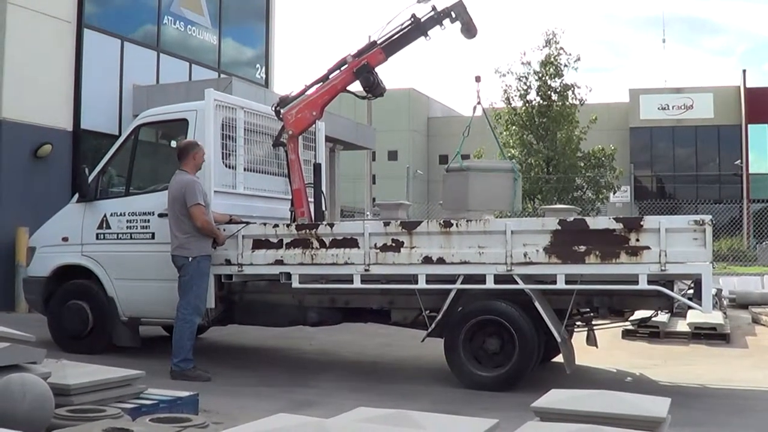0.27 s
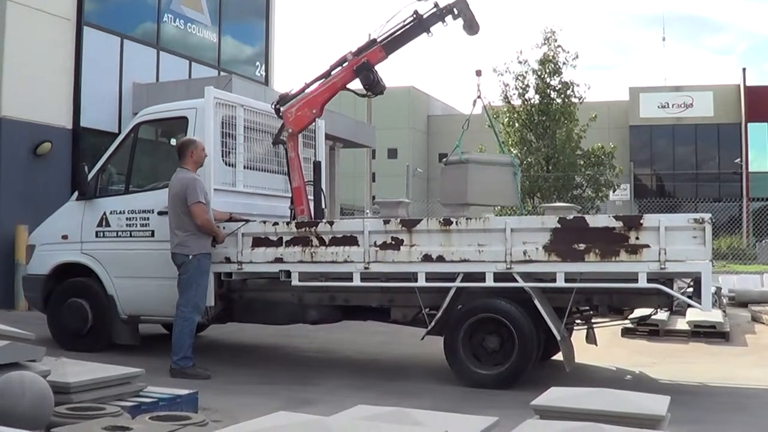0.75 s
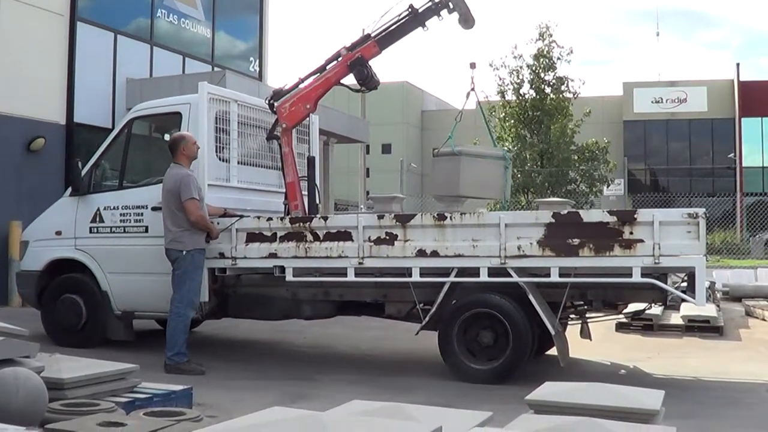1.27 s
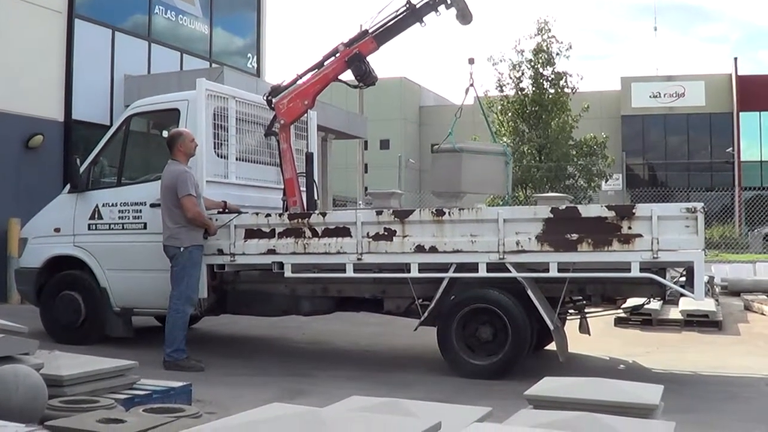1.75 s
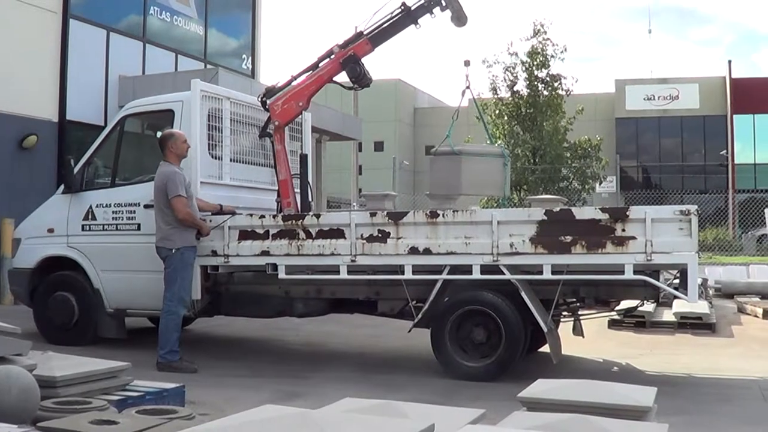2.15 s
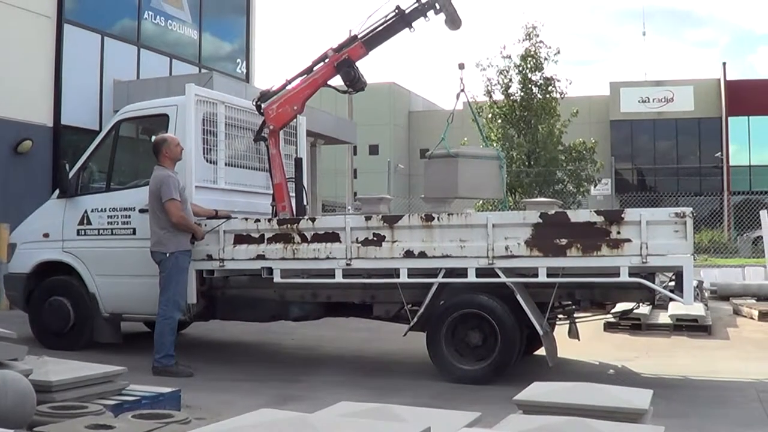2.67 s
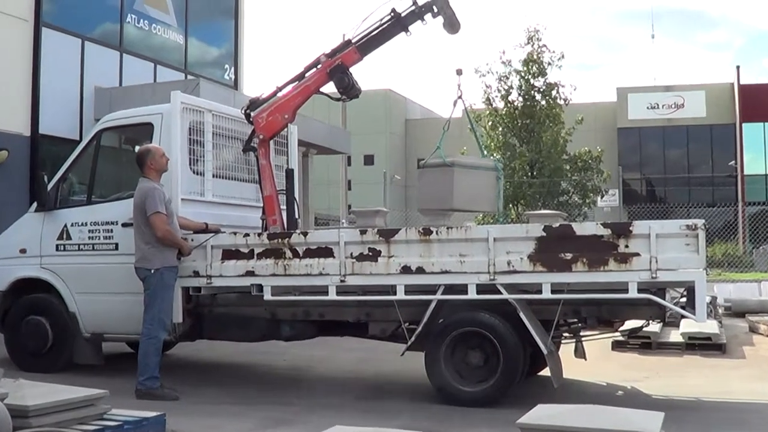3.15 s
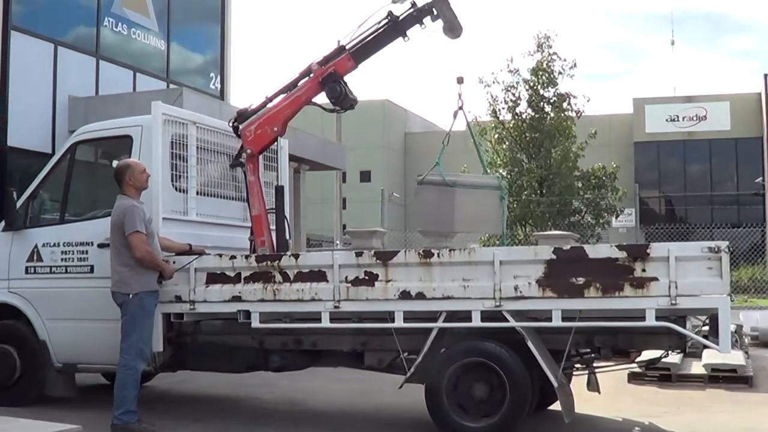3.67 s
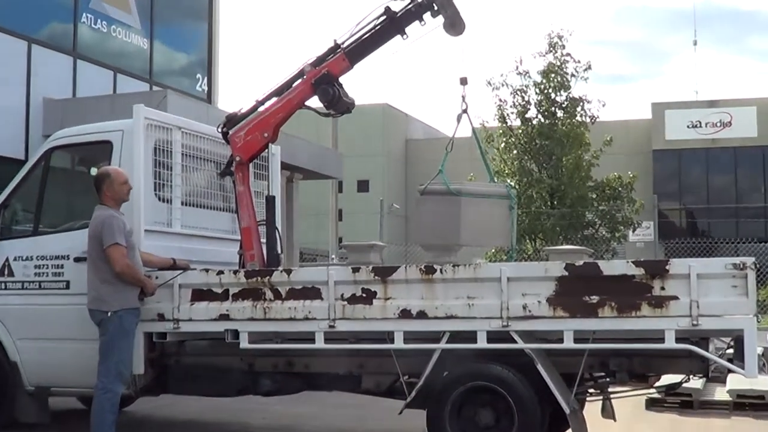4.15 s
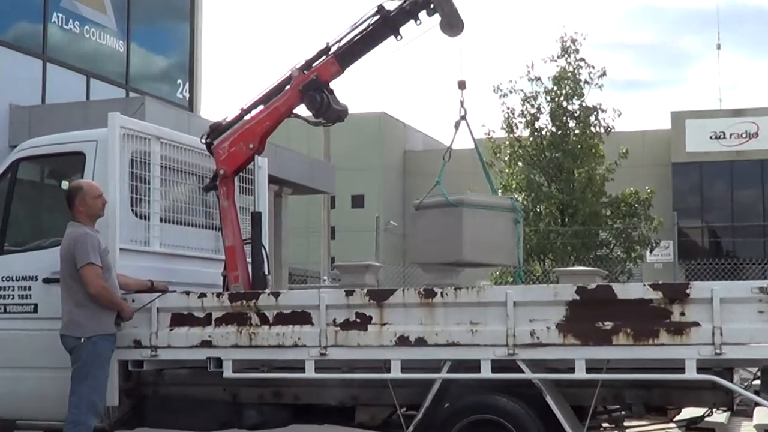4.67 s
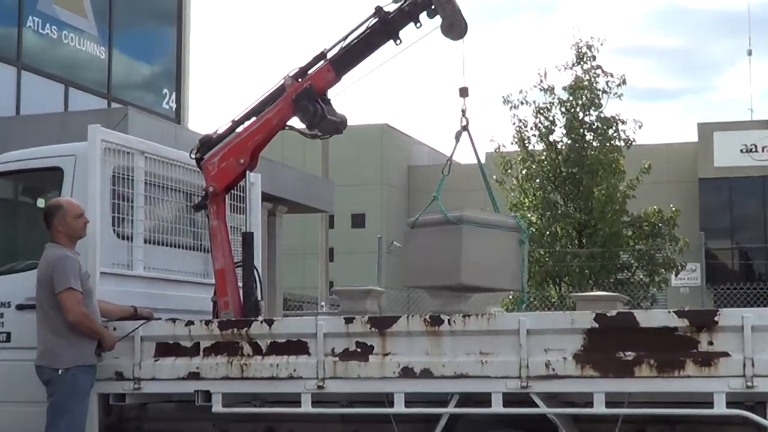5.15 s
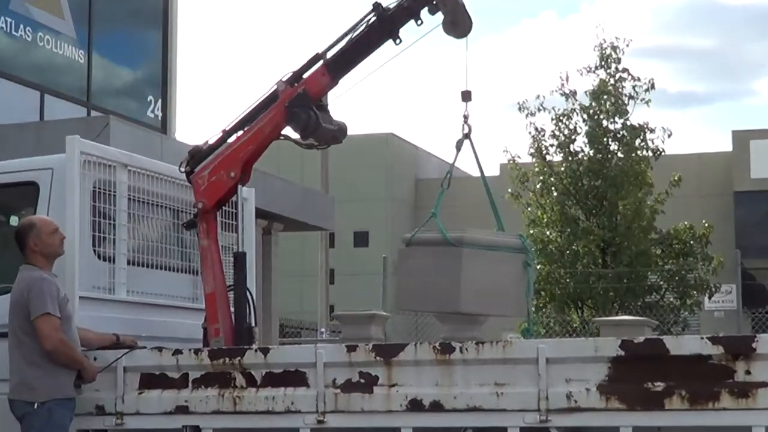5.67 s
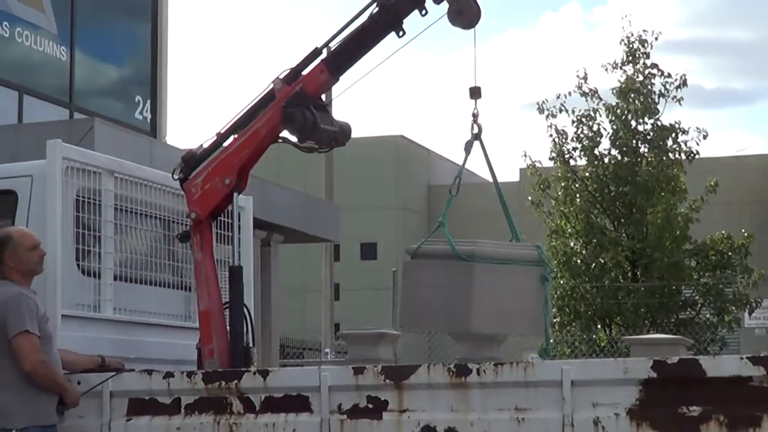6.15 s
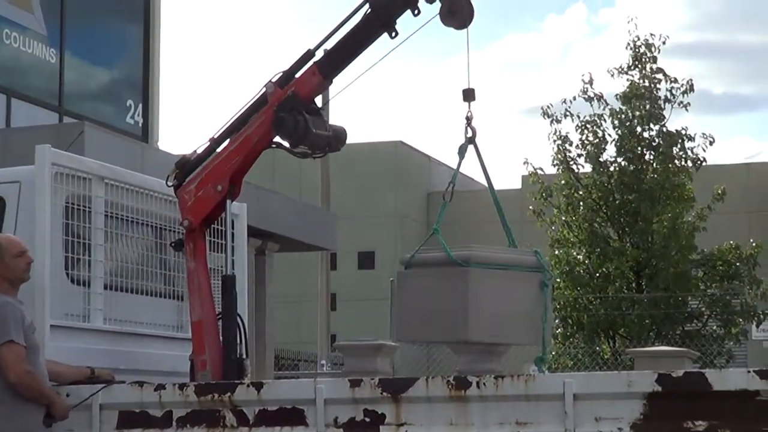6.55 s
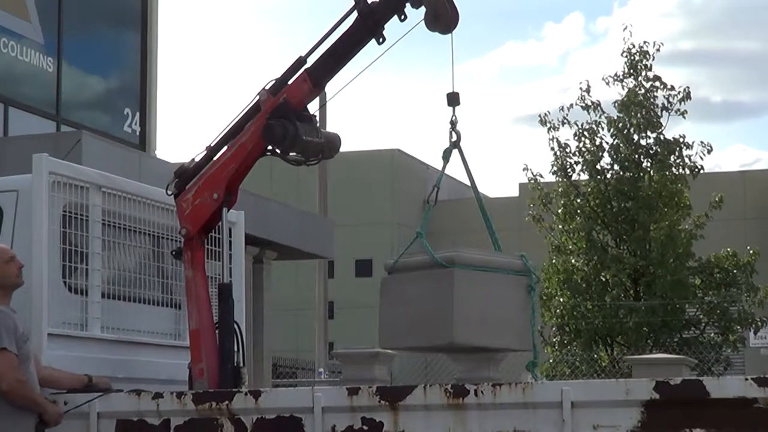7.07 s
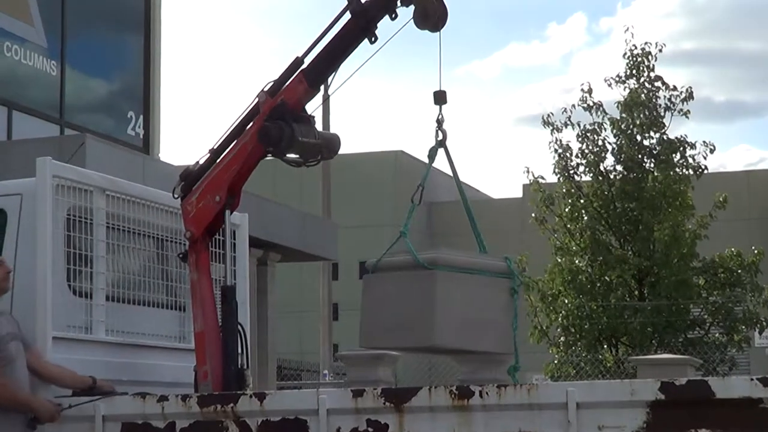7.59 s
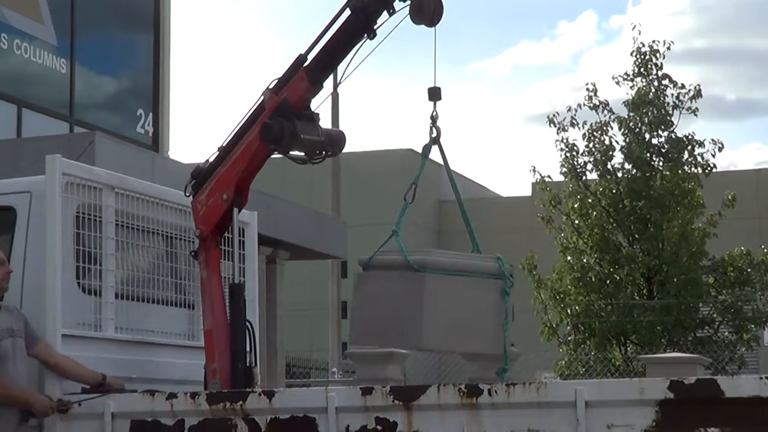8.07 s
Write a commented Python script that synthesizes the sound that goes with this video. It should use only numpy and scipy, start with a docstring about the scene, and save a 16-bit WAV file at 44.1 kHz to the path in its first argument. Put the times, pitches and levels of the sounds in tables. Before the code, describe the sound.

A truck crane's hydraulic pump whines steadily, briefly racing higher, while wind buffets the microphone over a low rumble.

```python
"""A truck crane swings a hanging load in a yard; gusts buffet the microphone over a low, steady rumble.
At first the gear pump whines evenly. A valve shuts, its lever clicks twice amid the hardest gusts,
and the pump races while the oil runs free. Near 3 s a valve takes up the load: oil rushes in the
lines and the pump labours again. From 3.7 s the crane grows louder and seems closer."""
import sys
import numpy as np
from scipy import signal
from scipy.fft import rfft, irfft, next_fast_len
from scipy.io import wavfile
from scipy.ndimage import uniform_filter1d, map_coordinates

SR = 44100
rng = np.random.default_rng(int(sys.argv[2]) if len(sys.argv) > 2 else 0)


def master(y):
    """Save y as 16-bit WAV."""
    cut = np.clip(np.atleast_2d(y).T, -1, 1)
    pcm = np.round(cut * 32767)  # scale
    wavfile.write(sys.argv[1], SR, pcm.astype(np.int16))


N = 366912

# background rumble of the yard: (frequency [Hz], relative level [dB])
RUMBLE_SPECTRUM = [(20, 7), (50, 24), (130, 0), (250, -16), (500, -25), (1200, -31), (4000, -92)]
# likeness of left and right at the microphone: (frequency [Hz], correlation [0-1])
YARD_COHERENCE = [(100, 0.86), (1000, 1), (8000, 0.72), (12000, 1)]
WIND_COHERENCE = [(30, 0.56), (120, 0.89), (260, 0.1), (1000, 0.033)]
# wind thumping, tearing and flapping at the microphone's rim: (frequency [Hz], relative level [dB])
BUFFET_SPECTRUM = [(15, -9.5), (30, -12.5), (60, -3), (130, 1), (200, -5.5), (300, -12.5), (500, -24.5),
                   (1000, -33.5), (3000, -86)]
TEAR_SPECTRUM = [(40, -29), (90, -13.5), (150, 0), (250, 0.5), (340, -4.5), (450, -10), (700, -19.5),
                 (1300, -44), (4000, -89)]
FLAP_SPECTRUM = [(300, -31), (650, 5), (1300, -2), (2200, -15), (4000, -48)]
# gusts on the microphone: (time [s], rise [s], fall [s], peak strength [dB])
WIND_GUSTS = [(.25, 0.12, 0.25, -46), (.71, 0.15, 0.12, -30.5), (1.6, 0.18, 0.16, -32),
              (1.754, 0.063, 0.12, -19.5), (2.1, 0.039, 0.091, -22.5), (2.372, 0.15, 0.15, -22.5),
              (2.92, .12, 0.19, -37.5), (4.2, 0.23, .14, -43), (5.45, 0.17, 0.14, -33.5),
              (5.93, 0.082, 0.19, -38.5), (6.74, 0.068, .15, -26.5), (8.32, .15, 0.23, -30.5)]
# the stronger single puffs: (time [s], relative peak [dB])
WIND_PUFFS = [(.186, -22.5), (0.322, -30.5), (.45, -30), (0.558, -31.5), (.642, -26.5), (0.749, -20.5),
              (.778, -22), (.939, -31.5), (1.068, -33.5), (1.139, -28), (1.356, -25.5), (1.445, -24),
              (1.522, -19), (1.579, -24.5), (1.622, -23.5), (1.931, -18), (1.982, -18), (2.066, -23.5),
              (2.232, -23.5), (2.331, -23.5), (2.605, -30), (2.772, -33), (3.03, -29.5), (3.433, -36.5),
              (3.605, -34), (3.85, -36), (4.045, -32), (4.172, -31.5), (4.311, -30.5), (4.453, -34.5),
              (4.863, -32.5), (5.027, -30), (5.225, -30.5), (5.424, -27), (5.504, -26.5), (5.884, -32),
              (5.97, -23.5), (6.054, -32), (6.253, -30.5), (6.433, -29.5), (6.531, -30.5), (6.675, -26),
              (6.777, -24.5), (6.861, -27.5), (6.969, -26), (7.038, -27.5), (7.136, -30), (7.348, -32.5),
              (7.45, -28), (7.847, -33), (7.971, -33.5), (8.2, -29), (8.289, -31)]
# the crane grows louder at the microphone, as if closer: (time [s], gain [dB])
CLOSENESS = [(3.7, 0), (4.6, 1.5), (5.45, 4), (6.2, 4.5), (8.32, 6)]
# oil runs through a valve while it stands open: (opens [s], shuts [s], level before CLOSENESS [dB])
VALVE_OPENINGS = [(-.5, 1.32, -62.5), (2.94, 8.6, -47)]
# oil rushing and hissing in the lines: (frequency [Hz], relative level [dB])
RUSH_SPECTRUM = [(200, -7), (370, 4), (500, -2.5), (620, -5), (700, 0.5), (850, -7), (1000, -14), (1300, 2),
                 (1500, -6), (1780, 4.5), (2050, -3), (2600, -16), (5000, -21), (15000, -21.5)]
HISS_SPECTRUM = [(300, 1), (1000, 6), (2000, 1.5), (2800, 4), (3800, 6), (5300, 3), (6700, 4), (7150, 10),
                 (7600, 3.5), (9000, 0.5), (11500, -6), (13200, -3), (15800, -4.5)]
# short bands of oil hiss, and a brief ring near 700 Hz as the pump slows:
# (time [s], half length [s], centre [Hz], width [Hz], level [dB])
HISS_AND_RING_BANDS = [(.33, 0.21, 3230, 389, -57.5), (1.184, 0.17, 9100, 1370, -54.5),
                       (3.046, 0.043, 8970, 6000, -50), (3.135, 0.036, 11500, 3487, -50),
                       (3.249, 0.036, 6940, 5990, -52.5), (3.277, 0.032, 711, 109.8, -39.5),
                       (3.358, 0.17, 712, 70, -49.5), (3.357, 0.092, 2260, 119.9, -50.5),
                       (5.73, .06, 1800, 300, -45), (6.93, .05, 1780, 300, -41.5),
                       (8.047, 0.054, 1780, 299.5, -49), (8.13, 0.024, 8000, 6000, -48),
                       (8.185, 0.0084, 8480, 5004, -41.5), (8.203, 0.01, 7800, 5013, -41.5)]
# the lever hitting its stop: (time [s], gain [dB], low cut [Hz])
LEVER_CLICKS = [(1.563, -30, 5400), (2.03, -29, 2480)]
# ring of the lever's steel: (frequency [Hz], relative level [dB], t60 [s])
LEVER_MODES = [(2494, -8, 0.047), (4165, -1, 0.026), (4600, -8, 0.044), (7270, -4, 0.035),
               (8270, -2, 0.083), (11000, -25, .05)]
# the pump's speed: (time [s], tooth rate [Hz])
PUMP_SPEED = [(0, 596), (.6, 598.2), (.97, 604.7), (1.14, 614.8), (1.41, 638.7), (1.5, 726), (1.56, 763),
              (1.68, 737.5), (1.81, 676), (1.9, 584), (2.09, 591), (2.2, 713), (2.27, 762), (2.41, 817),
              (2.53, 849), (2.8, 859.4), (2.97, 845.5), (3.08, 738.4), (3.2, 688.4), (3.31, 546.6),
              (3.42, 544), (3.49, 553.8), (4.1, 566), (4.24, 575.5), (4.36, 574.6), (4.54, 585.3),
              (4.72, 580.8), (5.15, 592.8), (5.42, 595.8), (6.02, 578), (6.24, 582.5), (6.36, 579.8),
              (6.49, 584.4), (6.61, 583.5), (7.2, 589.3), (7.58, 597.7), (7.76, 597.6), (8.2, 586.5),
              (8.32, 582)]
# resonances of the pump housing and crane column: (centre [Hz], width [Hz], relative level [dB])
HOUSING_MODES = [(3220, 990, -5), (3500, 750, 1.5), (4200, 440, -1.5), (4750, 490, -3), (5910, 240, -5),
                 (6486, 150, 0), (6980, 650, 2.5), (8293, 230, 1.5), (9700, 1100, -7.5), (10650, 280, -4),
                 (11700, 588, -7), (12950, 810, 0), (14180, 440, 0.5), (15400, 400, -12)]
# standing waves that the low harmonics slide through: (centre [Hz], width [Hz], gain [dB])
STANDING_WAVES = [(556.4, 30, -38), (586.5, 20.4, -39.5), (630, 22.4, -38), (711, 67, -35.5),
                  (809, 130, -41), (1152, 124, -52.5), (1186, 16, -47.5), (1234, 114, -54.5),
                  (1724, 210, -60), (1814, 16, -54), (1922, 38, -53), (2309.6, 38, -49.5),
                  (2377, 44, -56.5)]
# strong tones beside the low harmonics: (harmonic [number], offset [shaft orders], relative level [dB])
SHAFT_SIDEBANDS = [(1, -5, -16), (1, -4, -27.5), (1, -1, -17.5), (2, -1, -12.5), (2, 1, -0.5), (3, 1, -14),
                   (4, 2, -10.5)]

TEETH, TOP_HZ = 13, 15830  # teeth on the pump's gear; the microphone's band limit
FADE_DB = 0.68  # slow random swelling and fading of the whine, deeper for higher harmonics


def amp(db):
    return 10 ** (np.asarray(db) / 20)


def unit_rms(x):
    return x / np.sqrt(np.mean(x ** 2) + 1e-20)


def over_frequency(points, hz):
    """Join (frequency, value) points on a log axis."""
    knots_hz, values = np.transpose(points)
    return np.interp(np.log(hz + 1), np.log(knots_hz + 1), values)


def over_time(points):
    """Join (time, value) points, one value a sample."""
    return np.interp(np.arange(N) / SR, *np.transpose(points))


def wobble(rate):
    """A smooth random curve, rate knots a second."""
    steps = np.arange(0, N + 32, 32)
    knots = rng.standard_normal(int(N * rate / SR) + 4)
    return np.interp(np.arange(N), steps, map_coordinates(knots, [steps * rate / SR]))


def held(on_s, off_s, attack_s, release_s):
    """Rises from 0 to 1 after on_s, holds, and falls after off_s."""
    t = np.arange(N) / SR
    return np.clip((t - on_s) / attack_s, 0, 1) * np.clip(1 - (t - off_s) / release_s, 0, 1)


def swell(peak_s, rise_s, fall_s):
    """A bell curve that reaches 1 at peak_s."""
    t = np.arange(N) / SR - peak_s
    near, out = (t > -4 * rise_s) & (t < 4 * fall_s), np.zeros(N)
    out[near] = np.exp(-(t[near] / np.where(t[near] < 0, rise_s, fall_s)) ** 2)
    return out


def filtered(x, response):
    """Shape x by a gain that depends on frequency."""
    size = next_fast_len(N + SR // 4)
    return irfft(rfft(x, size) * response(np.fft.rfftfreq(size, 1 / SR)), size)[..., :N]


def resonances(modes, floor_db, hz):
    """Gain of a set of resonances over a flat floor."""
    power = sum(amp(db) ** 2 / (1 + (2 * (hz - centre) / width) ** 2) ** 2
                for centre, width, db in modes)
    return np.sqrt(amp(floor_db) ** 2 + power)


def stereo_noise(spectrum, coherence):
    """Coloured noise of rms 1, built as a mid-side pair."""
    def mid_side_gains(hz):
        spread = np.arccos(np.clip(over_frequency(coherence, hz), -1, 1)) / 2
        return amp(over_frequency(spectrum, hz)) * [np.cos(spread), np.sin(spread)]
    mid, side = filtered(rng.standard_normal((2, N)), mid_side_gains)
    return unit_rms(np.array([mid + side, mid - side]))


def yard_rumble(level_db):
    """The low, steady bed behind everything else."""
    return amp(level_db) * stereo_noise(RUMBLE_SPECTRUM, YARD_COHERENCE)


def eddies(spectrum, steady_s):
    """Turbulence whose strength holds over spans longer than steady_s."""
    air = stereo_noise(spectrum, WIND_COHERENCE)
    power = uniform_filter1d(np.mean(air ** 2, 0), int(steady_s * SR) + 1)
    return air / np.sqrt(np.abs(power) + 1e-6)


def torn_share(strength, half_db=-25, span_db=5.5):
    """The share of the wind that tears: half of it at a strength of half_db."""
    return 1 / (1 + np.exp((half_db - 20 * np.log10(strength)) / span_db))


def wind(breeze_db=-44.5, puff_db=2.5, lumpy_db=3, tear_db=1, flap_db=-14, rip_db=5):
    """Right on the microphone: eddies thump, fast gusts tear into a brighter roar, hard puffs flap."""
    gusts = amp(breeze_db) + sum(amp(db) * swell(s, rise, fall) for s, rise, fall, db in WIND_GUSTS)
    puffs = sum(amp(db + puff_db) * swell(s, rise_s=0.014, fall_s=0.019) for s, db in WIND_PUFFS)
    torn = torn_share(gusts + 0.08 * puffs)
    force = np.maximum(gusts * amp(lumpy_db * (1.5 - torn) * wobble(40)), puffs)
    thump = (1 - torn) * eddies(BUFFET_SPECTRUM, steady_s=0.0238)
    roar = np.sqrt(torn) * amp(tear_db) * eddies(TEAR_SPECTRUM, steady_s=0.0205)
    flap_gain = torn_share(gusts + 0.18 * puffs) * amp(flap_db + rip_db * wobble(140))
    flap = flap_gain * stereo_noise(FLAP_SPECTRUM, WIND_COHERENCE)
    return force * (thump + roar + flap)


def yard_reverb(direct, t60_s=0.33, gap_s=0.004, dull_hz=9000):
    """Walls and the truck's flank answer briefly, differently left and right."""
    t = np.arange(SR // 3) / SR
    tail = rng.standard_normal((2, len(t))) * amp(-60 * t / t60_s) * (t > gap_s)
    wet = signal.fftconvolve(direct[None], tail / np.linalg.norm(tail[0]), axes=1)[:, :N]
    return filtered(wet, lambda hz: 1 / (1 + (hz / dull_hz) ** 2))


def wall_whine(shaft, delay_s=0.035):
    """Off the walls the whine comes late and blurred, in opposite phase at the two microphone ports."""
    late = shaft - np.gradient(shaft) * SR * delay_s
    echo = gear_whine(late, blur_hz=49, waver_db=-0.2, shudder_db=7, racing_db=6, floor_db=-58)
    return echo * np.array([[1], [-1]])


def oil_flow(shaft, throb=0.13, grain=0.35, sputter_db=1.7, surge_db=1.47, hiss_db=-55, jet_db=-10):
    """Oil surges through the open valve, pulsing each turn; its hiss follows pump speed and effort."""
    flow = sum(amp(db) * held(opens, shuts, attack_s=0.13, release_s=0.18)
               for opens, shuts, db in VALVE_OPENINGS)
    flow = flow * amp(over_time(CLOSENESS))
    rush = stereo_noise(RUSH_SPECTRUM, YARD_COHERENCE) * (1 + throb * np.sin(shaft))
    rush = unit_rms(rush * amp(sputter_db * wobble(110) + surge_db * wobble(9)))
    hiss = unit_rms(stereo_noise(HISS_SPECTRUM, YARD_COHERENCE) * (1 + grain * np.sin(TEETH * shaft)))
    octaves = np.log2(over_time(PUMP_SPEED) / PUMP_SPEED[0][1])
    pump_hiss = amp(hiss_db + 0.18 * effort_db() + 5 * octaves)
    return flow * rush + np.hypot(pump_hiss, amp(jet_db) * flow) * hiss


def hisses_and_ring():
    """Short bands of oil hiss, and a brief ring near 700 Hz as the pump slows."""
    t, out = np.arange(N) / SR, np.zeros(N)
    for s, half_s, centre_hz, width_hz, db in HISS_AND_RING_BANDS:
        white = rng.standard_normal(N)
        band = filtered(white, lambda hz: 1 / (1 + ((hz - centre_hz) / width_hz * 2) ** 2))
        out += amp(db) * np.exp(-((t - s) / half_s) ** 2) * unit_rms(band)
    return out


def valve_lever(scrape_t60_s=0.047, rise_s=0.0014, bounce_s=0.007, bounce_gain=0.39):
    """The lever hits its stop and bounces: a scrape and a short steel ring."""
    t, out = np.arange(SR // 4) / SR, np.zeros(N)
    for s, db, low_cut_hz in LEVER_CLICKS:
        low_cut = signal.butter(2, low_cut_hz, 'high', fs=SR, output='sos')
        for delay, gain in ((0, 1), (bounce_s, bounce_gain)):
            ring = sum(amp(level - 60 * t / t60) * np.sin(2 * np.pi * (hz * t + rng.random()))
                       for hz, level, t60 in LEVER_MODES)
            scrape = amp(-60 * t / scrape_t60_s) * rng.standard_normal(len(t))
            contact = (ring + scrape) * (1 - np.exp(-t / rise_s))
            out[round((s + delay) * SR):][:len(t)] += amp(db) * gain * signal.sosfilt(low_cut, contact)
    return out


def effort_db(slack_db=-14):
    """The pump loses pressure when the first valve shuts and recovers after the second lever click."""
    return slack_db * held(VALVE_OPENINGS[0][1], LEVER_CLICKS[1][0], attack_s=0.57, release_s=0.39)


def shudder(steady=0.12, per_octave_s=0.381, inertia_s=0.15):
    """The pump runs rougher the faster its speed changes."""
    octaves_per_s = np.abs(np.gradient(np.log2(over_time(PUMP_SPEED)))) * SR
    return steady + per_octave_s * uniform_filter1d(octaves_per_s, int(inertia_s * SR) + 1)


def shaft_angle(flutter=0.001515):
    """The pump shaft's angle in radians; its speed trembles with the shudder."""
    tooth_hz = over_time(PUMP_SPEED) * (1 + flutter * shudder() * wobble(70))
    return 2 * np.pi * np.cumsum(tooth_hz / TEETH) / SR


def shaft_tone(shaft, order):
    """A sine at a multiple of the shaft speed, silent above the audible range."""
    audible = order * np.gradient(shaft) < 0.9 * np.pi
    return np.sqrt(2) * audible * np.sin(order * shaft + rng.uniform(0, 2 * np.pi))


def housing_buzz(shaft, level_db=-52.5, strain_db=3.5, uneven=0.24, ripple_db=2.2, flicker_db=1.65):
    """Upper harmonics slide through the housing's resonances; unequal teeth pattern each turn."""
    turn = np.linspace(0, 2 * np.pi, 512, endpoint=False)
    place = (shaft / (2 * np.pi) * len(turn)).astype(int) % len(turn)
    offsets = np.delete(np.arange(-6, 7), 6)  # six shaft orders either side of a harmonic
    hz = np.arange(0, SR / 2, 10)
    body = resonances(HOUSING_MODES, floor_db=-10.5, hz=hz) * (hz < TOP_HZ)
    # standing waves ripple the response, so a gliding harmonic fades in and out
    body = body * amp(ripple_db * map_coordinates(rng.standard_normal(len(hz)), [hz / 30]))
    tooth_phase = TEETH * shaft + 0.022 * wobble(300)  # slight jitter
    tooth_hz, out = over_time(PUMP_SPEED), np.zeros(N)
    for k in range(5, 28):
        sidebands = uneven / np.abs(offsets) ** 0.88 * np.exp(2j * np.pi * rng.random(len(offsets)))
        pattern = 1 + sidebands @ np.exp(1j * np.outer(offsets, turn))
        harmonic = np.abs(pattern)[place] * np.sin(k * tooth_phase + np.angle(pattern)[place])
        out += np.interp(k * tooth_hz, hz, body) * amp(flicker_db * wobble(18)) * harmonic
    return amp(level_db + effort_db() + strain_db * np.tanh(shudder())) * unit_rms(out)


def gear_whine(shaft, blur_hz, waver_db, shudder_db, racing_db, floor_db):
    """The four lowest tooth harmonics swell on standing waves and beat with nearby shaft orders."""
    tooth_hz, hz = over_time(PUMP_SPEED), np.arange(4000)
    depth_db = waver_db + shudder_db * shudder()
    response = uniform_filter1d(resonances(STANDING_WAVES, floor_db, hz), blur_hz + 1)
    levels = {}
    for k in range(1, 5):
        swing_db = effort_db() + depth_db * wobble(60) + FADE_DB * k * wobble(4)
        levels[k] = np.interp(k * tooth_hz, hz, response) * amp(swing_db)
    out = sum(level * shaft_tone(shaft, k * TEETH) for k, level in levels.items())
    beating_db = np.interp(tooth_hz, [610, 800], [0, racing_db])  # sideband gain as the pump races
    for k, offset, db in SHAFT_SIDEBANDS:
        level = levels[k] * amp(db + beating_db + waver_db * wobble(9.5))
        out += level * shaft_tone(shaft, k * TEETH + offset)
    return out


def scene():
    """From the yard: the pump in the centre, the walls around it, wind on the microphone."""
    shaft, closeness = shaft_angle(), amp(over_time(CLOSENESS))
    whine = gear_whine(shaft, blur_hz=0, waver_db=0.44, shudder_db=5, racing_db=-8.5, floor_db=-62.5)
    crane = closeness * (whine + housing_buzz(shaft)) + hisses_and_ring() + valve_lever()
    walls = amp(-15.5) * yard_reverb(crane) + amp(-20) * closeness * wall_whine(shaft)
    return crane + walls + oil_flow(shaft) + wind() + yard_rumble(level_db=-51.5)


def record(dry):
    """The camera adds its thin line-scan whistle and keeps nothing above the band limit."""
    t = np.arange(N) / SR
    whistle = amp(-63) * np.sin(2 * np.pi * 15625 * t) * (1 + 0.85 * np.sin(2 * np.pi * 50 * t))
    return filtered(dry + whistle, lambda hz: hz < TOP_HZ)


dry = scene()
out = record(dry)
master(out)
```